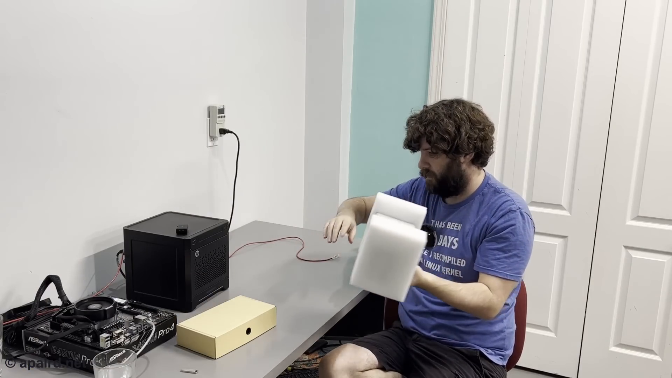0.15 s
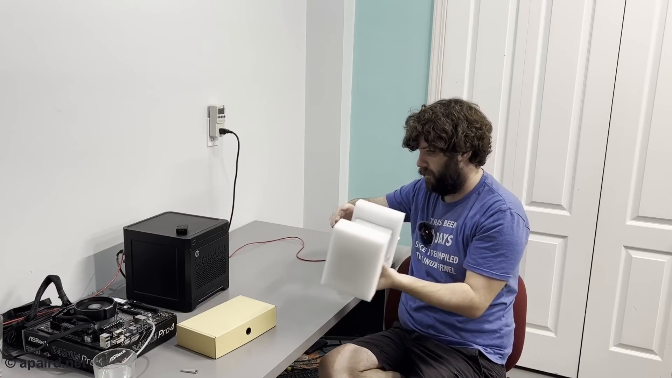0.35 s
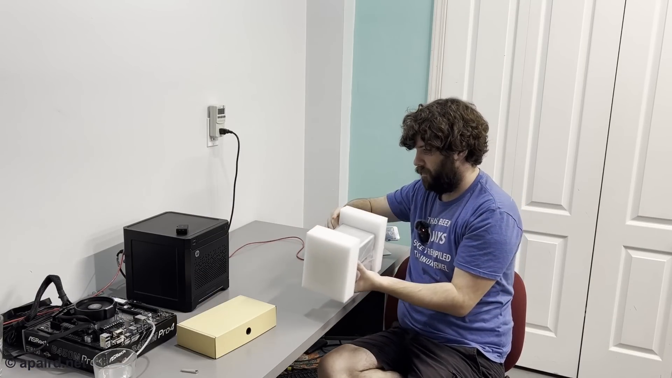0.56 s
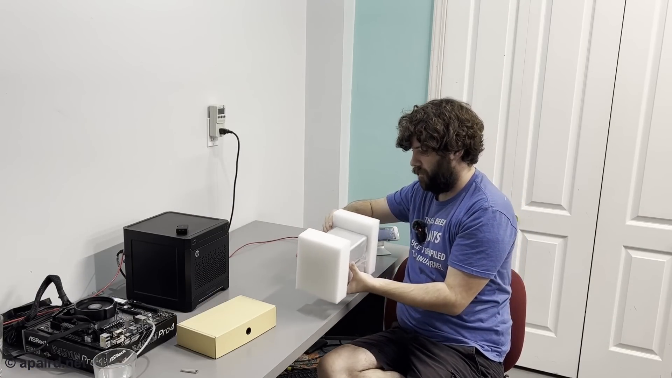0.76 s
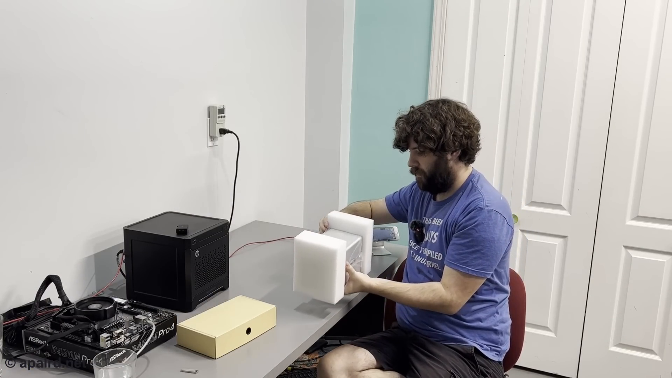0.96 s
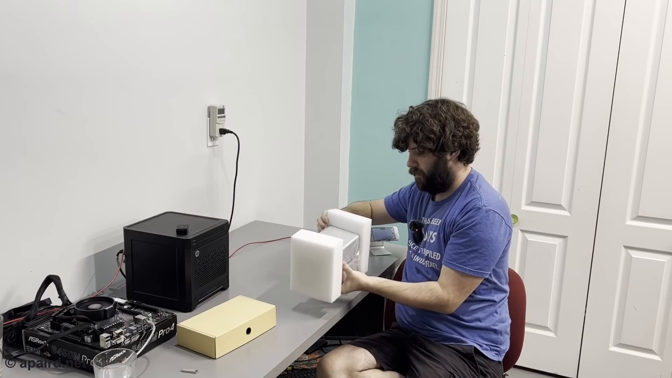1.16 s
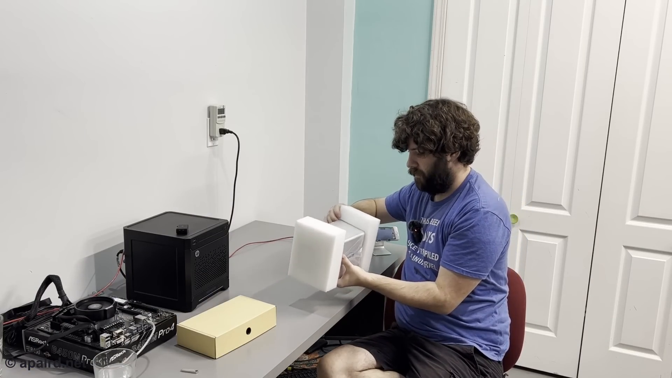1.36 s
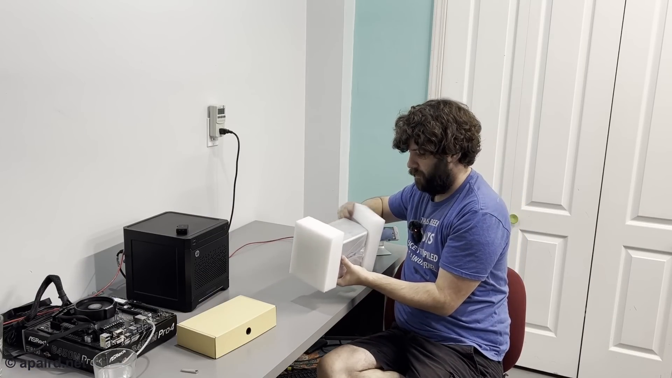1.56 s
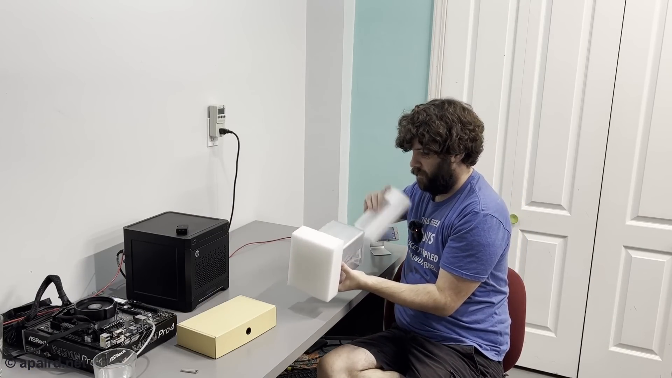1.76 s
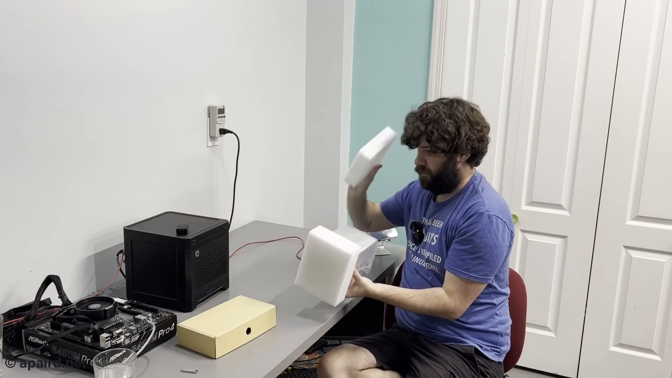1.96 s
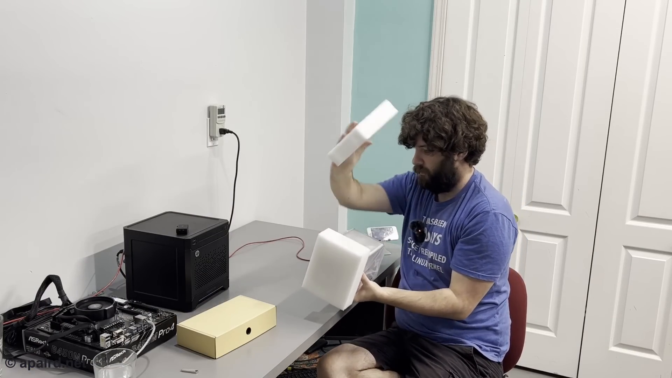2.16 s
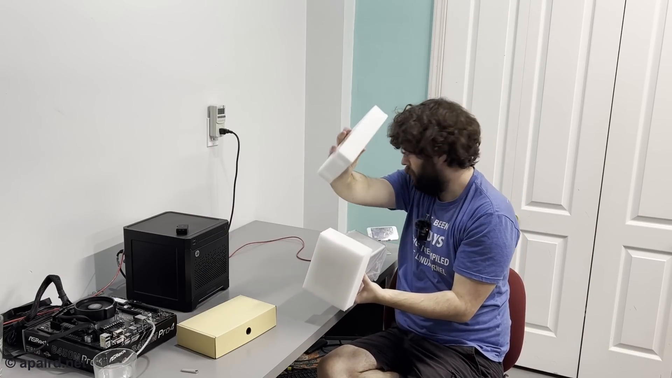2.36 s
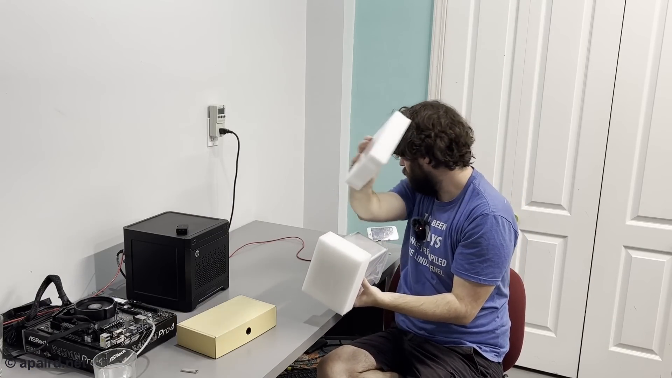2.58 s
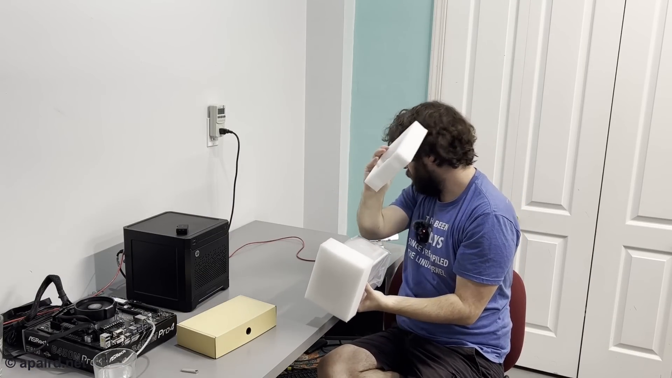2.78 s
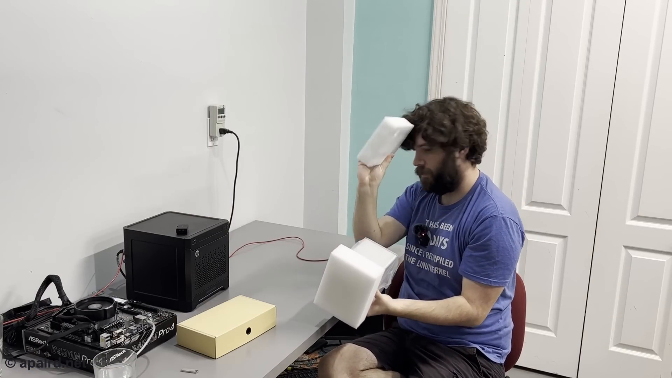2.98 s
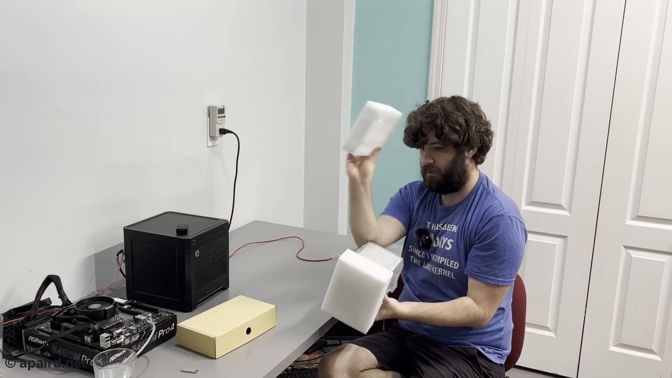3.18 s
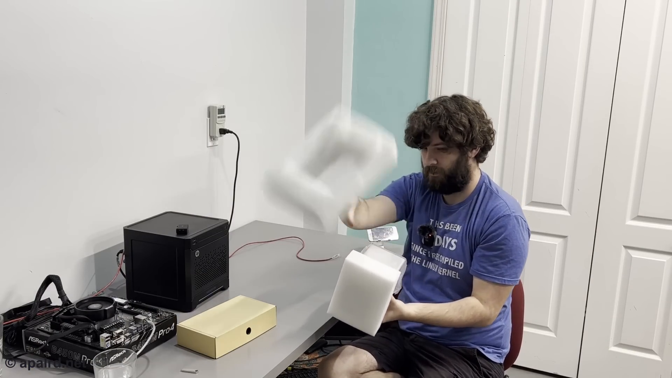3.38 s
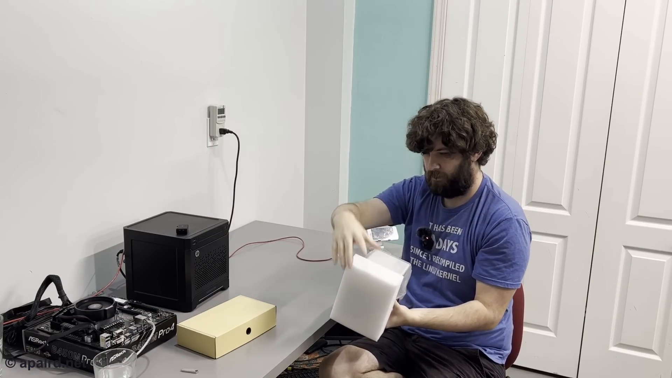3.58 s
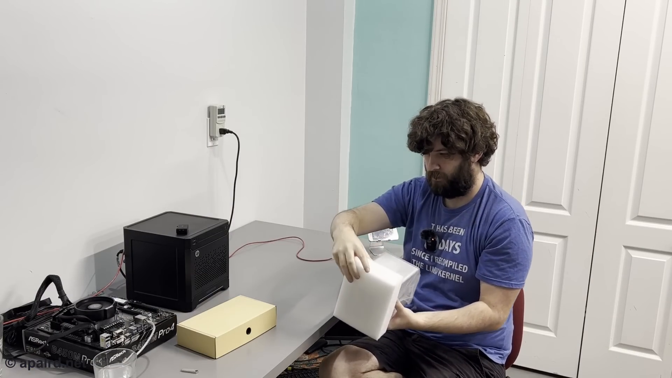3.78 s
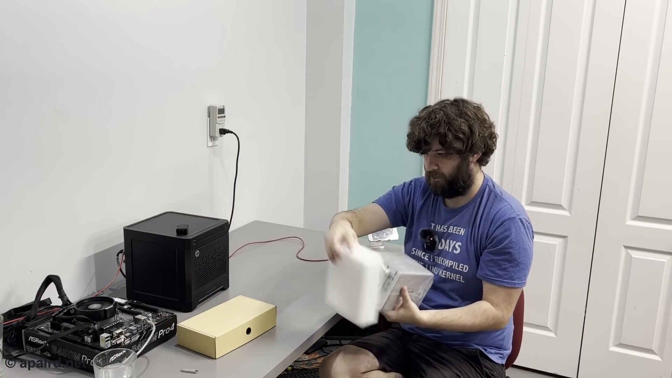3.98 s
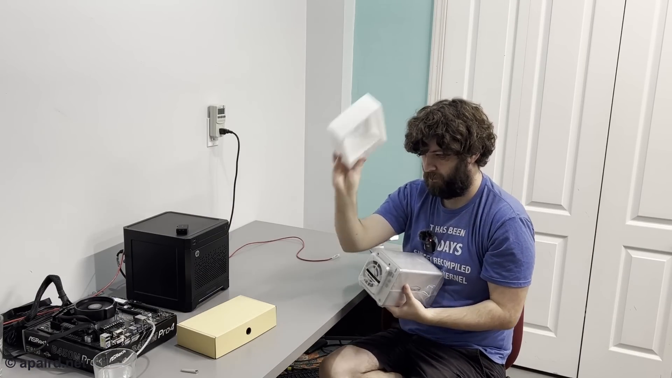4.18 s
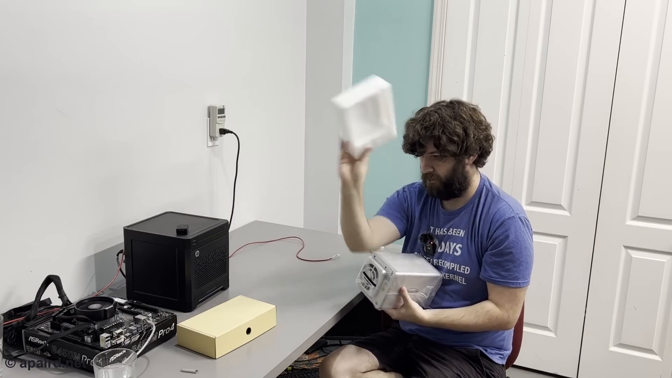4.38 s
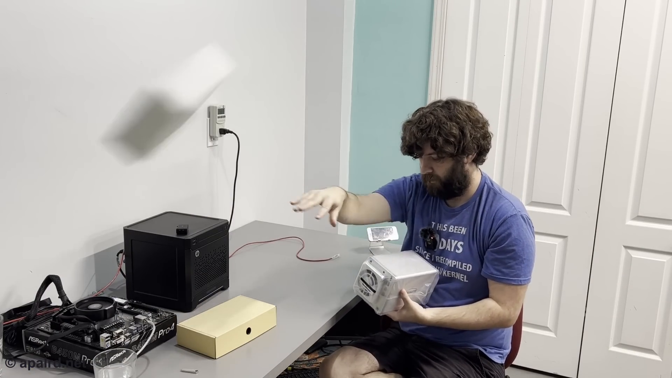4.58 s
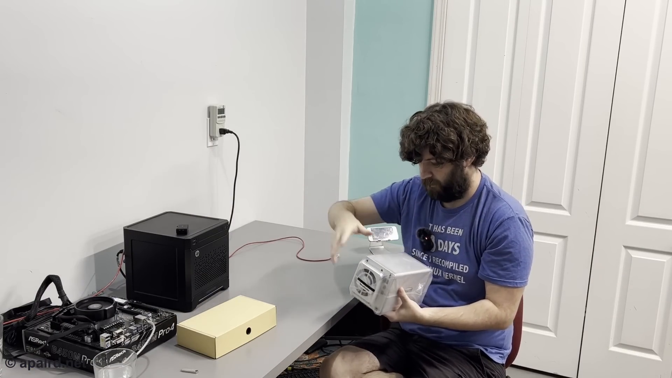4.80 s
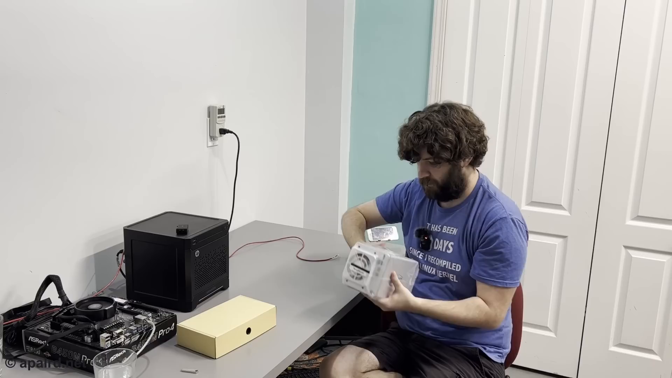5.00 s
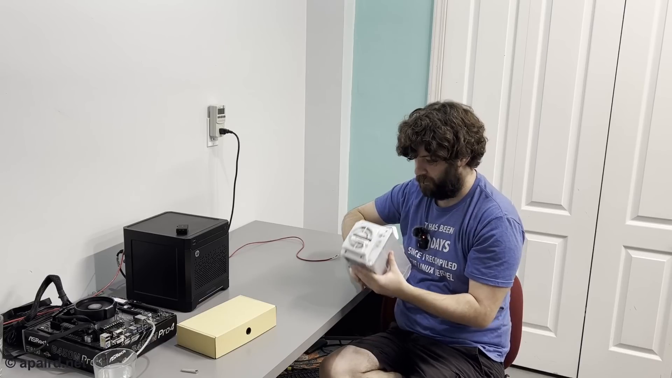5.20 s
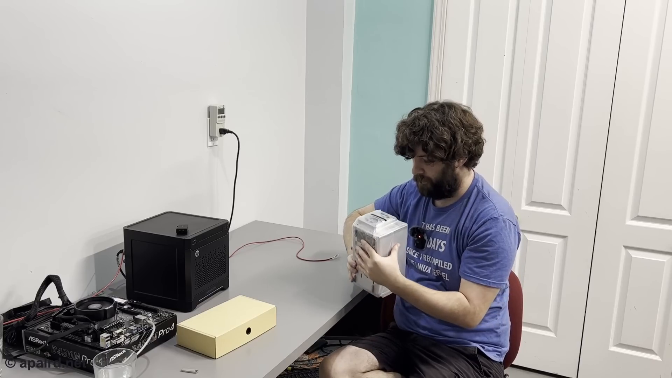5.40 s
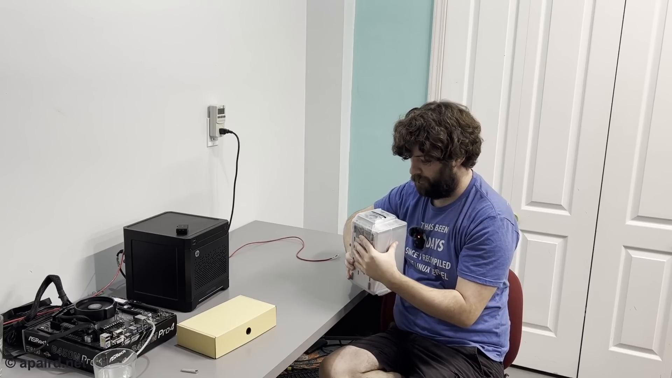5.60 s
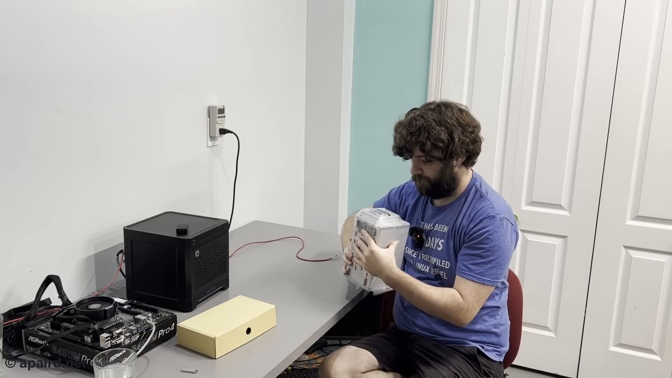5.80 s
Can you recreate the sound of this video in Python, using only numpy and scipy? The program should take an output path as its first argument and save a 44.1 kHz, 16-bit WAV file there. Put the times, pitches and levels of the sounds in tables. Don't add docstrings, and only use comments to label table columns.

```python
import sys
import numpy as np
from scipy import signal
from scipy.fft import rfft, irfft, next_fast_len
from scipy.io import wavfile
from scipy.ndimage import uniform_filter1d, map_coordinates

SR = 44100
rng = np.random.default_rng(int(sys.argv[2]) if len(sys.argv) > 2 else 0)


def wrap_up_sound(samples):
    columns = np.atleast_2d(samples).T
    tamed = np.clip(columns, -1, 1)
    steps = np.round(tamed * 32767).astype(np.int16)
    wavfile.write(sys.argv[1], SR, steps)


def nominal_scale(level):
    x = np.asarray(level, float) / 20
    return 10 ** x


N = 257896


def unit(x):
    return x / np.sqrt(np.mean(x ** 2) + 1e-20)


def along(points, hz):
    f, v = np.transpose(points)
    return np.interp(np.log(hz + 1), np.log(f + 1), v)


def filtered(x, response):
    m = next_fast_len(len(x) + 4096)
    return irfft(rfft(x, m) * response(np.fft.rfftfreq(m, 1 / SR)), m)[:len(x)]


def modes(table):
    def response(f):
        total = 0
        for k, (centre, width, db) in enumerate(table):
            damping = 1j * f * width
            total = total + (-1) ** k * nominal_scale(db) * damping / (centre * centre - f * f + damping)
        return total
    return response


def noise(spectrum, size):
    return unit(filtered(rng.standard_normal(size), lambda hz: nominal_scale(along(spectrum, hz))))


def wobble(rate):
    return map_coordinates(rng.standard_normal(int(N * rate / SR) + 4), [np.arange(N) * rate / SR])


def add(track, s, sound):
    part = track[max(round(s * SR), 0):][:len(sound)]
    part += sound[:len(part)]


def stutter(spectrum, patchy_db):
    slip_chance = 500 / SR * nominal_scale(7 * wobble(50))
    slips = (rng.random(N) < slip_chance) * nominal_scale(2.6 * rng.exponential(size=N))
    grain = 1 + 0.3 * unit(np.convolve(slips, np.exp(-np.arange(200) / 35))[:N])
    z = signal.stft(grain * rng.standard_normal(N), nperseg=256)[2]
    field = uniform_filter1d(uniform_filter1d(rng.standard_normal(z.shape), 14, 0), 3, 1)
    x = signal.istft(z * nominal_scale(patchy_db * unit(field)), nperseg=256)[1][:N]
    return unit(filtered(x, lambda hz: nominal_scale(along(spectrum, hz))))


# frequency in Hz, level in dB per Hz
HISS = [(1200, 5), (2200, -0.5), (3000, -3.5), (4500, 1), (6500, 0), (9000, -11), (16000, -46)]
SCRAPE = [(120, -16.5), (200, -2.5), (430, -8.5), (793, -9), (1080, -14.5), (1500, -12.5), (3500, -25),
          (4550, -58), (7700, -120)]
AIR = [(4000, -40.5), (7500, 2.5), (10000, 1.5), (13000, -3), (16200, -7.5)]
# loudest moment in seconds, hiss in dB, scrape over hiss in dB,
# rise and fall in seconds per 20 dB (sign ignored)
RUBS = [(.784, -54, 11.5, 0.031, 0.01), (.816, -54.5, 7.5, 0.0038, 0.06), (1.06, -58.5, 8, 0.078, 0.12),
        (1.15, -52, -6, 0.15, .09), (1.342, -53, 9, 0.013, 0.1), (1.478, -59, 7, 0.03, 0.25),
        (1.435, -55, 6, .005, .06), (1.285, -62, 10, .03, .05), (1.598, -41, 4, 0.019, 0.13),
        (1.734, -36, 1, 0.044, 0.09), (1.83, -40, 2, 0.1, 0.08), (1.916, -43.5, -20, .018, 0.12),
        (1.977, -37, 3, 0.004, 0.07), (2.04, -60, 17, .02, 0.0442), (2.097, -62, 17, .03, .03),
        (3.684, -61, 11, 0.072, 0), (1.56, -59.5, 7.5, 0.11, 0.18), (3.898, -47.5, -2.5, 0.29, 0.16),
        (3.954, -49.5, 9.5, 0.029, 0.45), (4.16, -60, 16.5, .02, 0.24), (4.275, -64, -17, .03, 0.1),
        (4.973, -54, 1, 0.023, 0.06), (5.124, -45, -8, 0.011, -0.07), (4.066, -46, -10, .012, 0.05),
        (4.962, -58, -4.5, 0.013, 0.2), (1.61, -40, 0, 0.022, -0.0139), (1.846, -40, -10, .04, 0.03),
        (1.775, -41, -2, .02, .03), (1.165, -53, 3, .01, .05), (5.208, -59.5, 14, .01, 0.12),
        (5.45, -76, 14, 0.054, .5), (5.588, -56, 10, 0.012, 0.1)]
SWISHES = [(1.119, -60, -7, .04, 0.2), (2.849, -71.5, 15, 0.062, 0.17), (3.028, -60.5, 2, 0.37, 0.24),
           (3.217, -56.5, 2, 0.066, 0.08), (3.265, -57, 0.5, 0.012, 0.05), (3.638, -54.5, -12, 0.022, .1),
           (5.412, -72, 0, .015, -0.66), (5.447, -73, 0.5, .01, .04), (4.185, -61, 0, .03, -0.32),
           (5.588, -64, 1, .01, .04), (3.017, -55.5, -10, 0.013, 0.03), (4.397, -57, 9.5, 0.0058, 0.12),
           (4.438, -59.5, 2, .07, 0.15)]


def rub():
    power, t = np.zeros((3, N)), np.arange(N) / SR
    layers = [stutter(HISS, patchy_db=3.0), stutter(SCRAPE, patchy_db=4.0), stutter(AIR, patchy_db=3.5)]
    scrape_swing, air_swing = 1, 1.63
    strokes = [(*r, -4) for r in RUBS] + [(*r, 4.5) for r in SWISHES]
    for s, db, scrape_db, rise, fall, air_db in strokes:
        span = slice(max(round((s - 5 * abs(rise)) * SR), 0), round((s + 5 * abs(fall)) * SR))
        below_db = -20 * np.maximum((s - t[span]) / abs(rise), (t[span] - s) / abs(fall))
        scrape = scrape_db + scrape_swing * below_db
        air = air_db + air_swing * below_db
        power[:, span] += nominal_scale(db + np.array([below_db, scrape, air])) ** 2
    return (np.sqrt(power) * layers).sum(axis=0)


# start in seconds, peak in dB, colour in Hz, knock in dB
BURSTS = [(0.7792, -38.5, 3780, 3), (.818, -32, 4500, -1.5), (.9502, -43.5, 3905, -14.5),
          (5.2501, -44.5, 6325, -2), (1.054, -40, 3796, -5), (1.074, -41, 3810, 2.5),
          (1.0853, -35, 3450, -2), (1.1002, -38, 3880, 2.5), (1.1209, -19.5, 5290, -7),
          (1.1545, -47.5, 4870, -0.5), (1.1697, -36.5, 5305, 3), (1.3326, -35, 6020, -4.5),
          (1.4731, -23.5, 4605, -5), (1.5383, -32.5, 4600, -4.5), (1.612, -24, 5200, 2),
          (1.6846, -31.5, 4910, -3.5), (1.7286, -27, 4183, 1.5), (1.8041, -22.5, 3690, 0),
          (1.9098, -35.5, 3640, -15), (1.9723, -34, 3265, -18), (1.9914, -30, 3476, -32),
          (3.0142, -43, 6500, -9.5), (3.2636, -40.5, 5370, -2), (3.6216, -42, 6400, -5),
          (3.719, -42.5, 5170, 2.5), (3.8858, -29, 5385, -4), (4.165, -26, 4376, 1.5),
          (4.9707, -22, 6260, -14.5), (4.9896, -31.5, 4186, -8.5), (5.2085, -33.5, 3875, -12.5)]
# start in seconds, peak in dB, knock in dB, air in dB
TICKS = [(0.3776, -54.5, 14.5, -21.5), (0.4911, -33.5, 1, -27.5), (0.6577, -55, 8, -17),
         (1.287, -48.5, 4, -14.5), (1.3403, -58, 17, -8), (1.431, -42.5, 9.5, 5.5), (1.4894, -63, 4, -16),
         (1.943, -48.5, -16, 2), (2.1156, -50, 4, -20), (2.8308, -57.5, -4.5, -11.5), (3.1802, -72, -1, 7),
         (3.2151, -54.5, 10, -10), (3.9589, -44, 3, -15.5), (3.9774, -45.5, -2, -16.5),
         (4.0327, -38, -5, -27), (4.0571, -48.5, 12.5, -16.5), (4.144, -39, -1, -3),
         (4.1567, -36, -5.5, -0.5), (4.1886, -47, 1, -15.5), (4.2138, -34.5, -35, -28),
         (4.2306, -43.5, 6, -14), (4.2541, -31, 10, -13), (4.3296, -44.5, 5, -29),
         (4.3954, -39.5, 0.5, -14), (4.4383, -47.5, -8, -1.5), (4.667, -58.5, 18.5, -15),
         (5.0193, -52, 2, -7.5), (.9936, -48, -15, 1.5), (5.6423, -55.5, 5.5, -1), (5.7988, -57.5, 8, -14)]


def snaps():
    out, t = np.zeros(N), np.arange(SR // 12) / SR
    bright = [(s, db, hz, knock_db, -12.5 - 0.55 * (db + 35.5)) for s, db, hz, knock_db in BURSTS]
    dull = [(s, db, 2622, knock_db, air_db) for s, db, knock_db, air_db in TICKS]
    for s, db, hz, knock_db, air_db in bright + dull:
        burst = nominal_scale(-60 * t / 0.0084) * rng.standard_normal(len(t))
        burst[0] += 4
        parts = [(0, hz, 0.75 * hz), (knock_db, 1300, 1900), (air_db, 9500, 8000)]
        for part_db, centre_hz, width_hz in parts:
            part = filtered(burst, lambda f: modes([(centre_hz, width_hz, 0)])(f) ** 2)
            add(out, s, nominal_scale(db + part_db + 3.5) * part / np.abs(part).max())
    return out


# frequency in Hz, width in Hz, level in dB
HOLLOW = [(175, 33, 5.5), (302, 75, 0.5), (390, 110, -1), (567, 120, -1), (658, 28, -0.5)]
# frequency in Hz, level in dB per Hz
EDGE = [(500, -24.5), (840, 3), (1100, -3.5), (1600, -4.5), (2300, -11.5), (3200, -17.5), (6000, -25.5),
        (16000, -46)]
# start in seconds, peak in dB, ring in Hz, edge in dB, t60 in seconds
DROPS = [(.084, -7.5, 506, -1.5, 0.46), (.087, -9, 450, -10.5, .06), (.148, -13, 530, -11, .42),
         (.494, -17.5, 388, -8.5, .34), (.527, -21, 410, -10.5, .26), (1.994, -23, 420, -24, 0.35),
         (5.113, -19.5, 169, -17, 0.184), (5.136, -19.5, 175, -10.5, 0.34), (5.197, -30.5, 242, -4.5, 0.2),
         (5.439, -41.5, 189, -15, 0.27), (5.573, -19, 219, -16, 0.31)]
TUMBLES = [(0.0, -7, 420, -10.5, 0.29), (2.131, -28, 184, -14.5, 0.4), (3.634, -34, 784, -3, 0.15),
           (3.957, -26, 597, -6, 0.095), (3.972, -20, 835, -10, 0.047), (4.015, -24, 427, -20, 0.31),
           (4.057, -17, 432, -14.5, 0.28), (4.082, -15, 533, -34, 0.11), (4.128, -25.5, 183, -22, 0.34),
           (4.414, -29.5, 457, -9.5, 0.53), (4.442, -28.5, 326, -17, 0.44), (5.322, -41, 422, -6, 0.37)]


def thuds():
    out, t = np.zeros(N), np.arange(SR // 2) / SR
    blows = [(*r, 2.5) for r in DROPS] + [(*r, -2) for r in TUMBLES]
    for s, db, ring_hz, edge_db, t60, ring_db in blows:
        after = np.clip(t - .006, 0, None) / t60
        body = unit(filtered(rng.standard_normal(len(t)), modes(HOLLOW)))
        blur = unit(filtered(rng.standard_normal(len(t)), modes([(ring_hz, 0.13 * ring_hz, 0)])))
        clean = nominal_scale(-60 * t / .12) * np.sin(2 * np.pi * ring_hz * t)
        ring = 0.54 * blur + 0.7 * clean
        wood = filtered(0.51 * body + nominal_scale(ring_db) * ring, lambda hz: 1 / (1 + (hz / 1500) ** 4))
        edge = noise(EDGE, len(t))
        dull = filtered(edge, lambda hz: 1 / (1 + (hz / 3000) ** 4))
        edge = nominal_scale(-70 * after) * dull + nominal_scale(-125 * after) * (edge - dull)
        edge = edge * (1 + 0.44 * nominal_scale(-60 * t / 0.017))
        rise = 1 - np.exp(-t / 0.001)
        add(out, s, nominal_scale(db - 8.0) * rise * (nominal_scale(-60 * after) * wood + nominal_scale(edge_db) * edge))
    return out


# frequency in Hz, level in dB, t60 in seconds
TABLE_TOP = [(295, -4.5, 0.33), (335.7, -12, 0.85), (431.4, 0, 0.27), (494.5, -2.5, 0.5),
             (701, -17.5, 0.88), (823, -3, 0.33), (1061, -5.5, 0.36), (1153, -7, 0.27), (1306, -6.5, 0.29),
             (1492, -12.5, 0.46), (1760, -15.5, 0.36), (2293, -23, 0.31)]
# start in seconds, peak in dB
SLAMS = [
    (0.0, -30),
    (.085, -23),
    (.15, -29),
]


def slams():
    out, t = np.zeros(N), np.arange(SR // 2) / SR
    for s, db in SLAMS:
        ring = np.zeros(len(t))
        for hz, level, t60 in TABLE_TOP:
            t60 = min(t60, 0.38)
            decay = nominal_scale(level + 1.8 * rng.standard_normal() - 60 * t / t60)
            phase = 2 * np.pi * (hz * t + rng.random()) + 0.8 * wobble(30)[:len(t)]
            ring += decay * np.sin(phase)
        add(out, s, nominal_scale(db) * (1 - np.exp(-t / 0.002)) * ring)
    return out


# start in seconds, peak in dB, frequency in
# Hz, t60 in seconds
SHOVES = [(0.498, -19.5, 402, 0.17), (0.821, -21, 367, 0.015), (1.073, -39, 138, 0.053),
          (1.611, -9, 162, 0.026), (1.684, -13.5, 340, 0.022), (1.723, -20.5, 83.4, 0.06),
          (1.751, -19, 88, 0.04), (1.788, -18.5, 185.5, 0.084), (1.8, -17.5, 92.5, 0.08),
          (1.926, -33.5, 113, 0.27), (2.1, -29.5, 122, 0.062), (2.18, -43.5, 114, 0.18),
          (3.16, -50.5, 88.5, 0.098), (3.23, -44, 117, 0.036), (3.722, -36, 150, 0.065),
          (3.812, -22.5, 218, 0.025), (4.209, -30, 243, 0.03), (.5, -38, 120, .25), (.245, -30, 520, .25),
          (5.846, -36, 150, .05), (5.011, -35, 380, 0.027), (5.78, -29, 387, 0.023),
          (5.835, -30, 412, 0.037),
          (0.384, -48.5, 111, 0.24),
    (1.981, -33, 120, 0.17),
    (2.005, -39, 118.8, 0.082),
    (3.876, -53, 109, 0.12),
    (3.956, -35, 146, 0.054),
    (4.016, -36.5, 125, 0.16),
    (4.121, -38, 149, 0.077),
    (5.111, -32.5, 145.4, 0.09),
]


def shoves():
    out, t = np.zeros(N), np.arange(SR // 4) / SR
    for s, db, hz, t60 in SHOVES:
        push = nominal_scale(db + 2.5 - 60 * t / t60) * (1 - np.exp(-t / 0.0039))
        add(out, s, push * np.sin(2 * np.pi * hz * t))
    return out


# frequency in Hz, level in dB, t60 in seconds
CAP = [(420, -3, 0.09), (608.5, 0, 0.085), (744, -3, 0.07), (1084, 4.5, 0.038), (1240, -10, 0.058),
       (1457, 4, 0.0194)]
# start in seconds, peak in dB
TAPS = [
    (1.9745, -13.5),
    (1.991, -18),
    (2.0, -22.5),
    (2.007, -25),
    (2.115, -24.5),
    (2.121, -25),
]


def taps():
    out, t = np.zeros(N), np.arange(SR // 5) / SR
    for s, db in TAPS:
        ring = np.zeros(len(t))
        for hz, level, t60 in CAP:
            ring += nominal_scale(level + 2 * rng.standard_normal() - 60 * t / t60) * np.sin(2 * np.pi * hz * t)
        add(out, s, nominal_scale(db + 7) * (1 - np.exp(-t / 0.00068)) * ring / np.abs(ring).max())
    return out


# start in seconds, peak in dB, frequency in Hz, t60 in seconds
PINGS = [(.0838, -9.5, 1630, 0.01), (.0912, -1, 600, .012), (.097, -9, 560, .015), (.16, -24, 2050, .03),
         (1.975, -22, 1500, .025), (1.98, -33, 3300, .02), (5.574, -30, 700, .02), (1.431, -36, 1200, .012),
         (2.0, -58, 12500, .05), (.0912, -17.5, 3170, .01), (1.156, -31, 1790, 0.011),
         (1.161, -40.5, 1510, .01), (1.181, -40.5, 2500, .006), (1.28, -43, 900, .012),
         (1.3355, -41.5, 5500, .004), (1.3403, -36, 1200, 0.013), (1.491, -32, 790, .025),
         (1.5673, -43, 2890, .006), (1.5932, -30, 1490, 0.011), (1.608, -28, 1270, .015),
         (1.663, -38, 5500, .005), (1.686, -34, 1840, .012), (1.7284, -21, 1860, 0.034),
         (1.755, -28, 4500, 0.013), (1.913, -33, 2250, .008), (3.636, -36, 1400, .015),
         (3.73, -44, 5500, .005), (3.925, -32.5, 420, 0.021), (3.9715, -23.5, 800, .025),
         (3.977, -21.5, 990, .015), (3.996, -34.5, 2130, .008), (4.033, -34.5, 6400, .004),
         (4.049, -39.5, 5000, .005), (4.1255, -41.5, 5000, .005), (4.166, -28, 1160, 0.022),
         (4.171, -33, 4500, .005), (4.184, -42, 2500, .006), (4.189, -42, 8300, .005),
         (4.259, -32.5, 2380, .007), (4.418, -34.5, 500, .02), (4.448, -32, 380, .03),
         (4.479, -42, 1647, .008), (5.006, -43, 1700, 0.013), (5.2605, -44, 6060, .004),
         (5.6423, -43.5, 4300, .008), (5.7988, -50, 4130, .008), (5.823, -60, 14300, .006),
         (5.8445, -49, 4200, .008)]


def pings():
    out, t = np.zeros(N), np.arange(SR // 20) / SR
    for s, db, hz, t60 in PINGS:
        rough = unit(filtered(rng.standard_normal(len(t)), lambda f: modes([(hz, 0.6 * hz, 0)])(f) ** 2))
        level = nominal_scale(db + 1 - 60 * t / t60) * (1 - np.exp(-t / 0.00026))
        add(out, s, level * (np.sin(2 * np.pi * hz * t) + 0.25 * rough))
    return out


# frequency in Hz, width in Hz, level in dB
RASP = [(1930, 150, 0), (4500, 800, -3), (6400, 370, -3.5)]
CHIRR = [(2700, 900, 0), (4000, 900, -2), (5500, 700, -2)]


def rasp():
    out, t = np.zeros(N), np.arange(SR // 5) / SR
    slips = [(1.726, -29, 0.15, RASP, .0023),
             (4.262, -46, 0.14, CHIRR, .015)]
    for s, db, t60, table, rise in slips:
        grit = unit(filtered(rng.standard_normal(len(t)), lambda f: modes(table)(f) ** 2))
        add(out, s, nominal_scale(db - 60 * t / t60) * (1 - np.exp(-t / rise)) * grit)
    return out


# time in seconds, frequency in Hz, level in dB
SQUEAK = [
    (5.6, 10600, -84),
    (5.621, 11260, -76),
    (5.655, 12420, -70),
    (5.675, 13050, -70),
    (5.695, 13520, -70),
    (5.73, 13670, -70),
    (5.773, 13350, -71),
    (5.805, 12740, -72),
    (5.845, 12780, -70),
]


def squeak():
    s, hz, db = np.transpose(SQUEAK)
    t = np.arange(N) / SR
    level = nominal_scale(np.interp(t, s, db, left=-120) + 2 + 1.5 * wobble(60))
    return level * np.sin(2 * np.pi * np.cumsum(np.interp(t, s, hz) + 25 * wobble(140)) / SR)


# start in seconds, length in
# seconds, frequency in Hz, level in dB
WHISPER = (5.675, -0.2, 9920, -74)


def whisper():
    out, (s, length, hz, db) = np.zeros(N), WHISPER
    t = np.arange(round(length * SR)) / SR
    add(out, s, nominal_scale(db) * np.sqrt(np.hanning(len(t))) * np.sin(2 * np.pi * hz * t))
    return out


# frequency in Hz, t60 in seconds
WALLS = [(200, 0.14), (1000, 0.18), (5000, 0.21), (14000, 0.33)]


def room(x):
    out, step = np.zeros(N), SR // 4
    for start in range(0, N, step):
        hz, t, z = signal.stft(rng.standard_normal(SR // 2), SR, nperseg=256)
        tail = signal.istft(z * nominal_scale(-60 * t / along(WALLS, hz)[:, None]), SR, nperseg=256)[1]
        echo = signal.fftconvolve(x[start:start + step], tail / np.linalg.norm(tail))
        add(out, start / SR + 0.0029, echo)
    return out


# frequency in Hz, level in dB per Hz
HUM = [(12, -46), (20, -19), (102, -6), (199, -12), (229, -3), (294, -18), (339, -11.5), (1160, -21.5),
       (1260, -24), (1870, -24), (2770, -29), (3010, -30.5), (7380, -30.5), (16200, -40.5)]
# time in seconds, level in dB
GAIN = [
    (0, 7.5),
    (.7, 3),
    (2.2, 3.5),
    (3.3, 2.5),
    (3.6, 0),
    (4.6, 3),
    (5.4, 1),
    (5.85, 1.5),
]


def hum():
    s, db = np.transpose(GAIN)
    level_db = -63 + np.interp(np.arange(N) / SR, s, db) + 0.44 * wobble(4.9)
    return nominal_scale(level_db) * noise(HUM, N)


def scene():
    near = snaps() + rub() + taps()
    heard = thuds() + near + shoves() + nominal_scale(-10.5) * room(near) + squeak() + hum() + rasp()
    small = pings()
    return (heard + slams() + whisper() + small + nominal_scale(-11) * room(small))[None]


# centre in seconds, length in seconds, lowest Hz, share of lines kept
STARVED = [(.52, .03, 4000, .02), (.59, .03, 4000, .02), (.757, .035, 2500, .06), (1.015, .03, 3000, .06),
           (1.138, .03, 2200, .07), (1.736, .022, 6900, 0), (2.42, .03, 2500, .12), (2.465, .03, 2500, .08),
           (2.57, .03, 2500, .1), (2.7, .03, 2000, .08), (2.85, .03, 2500, .08), (3.0, .03, 2000, .12),
           (3.105, .03, 2000, .08), (3.382, .075, 1500, .07), (3.765, .035, 2200, .08),
           (4.0, .03, 3500, .08), (4.275, .03, 6000, 0), (4.725, .03, 2000, .08), (4.92, .03, 3000, .06),
           (5.345, .026, 3000, .04), (5.535, .026, 3000, .04)]


def starved(x):
    out = x.copy()
    for s, length, from_hz, share in STARVED:
        fade = np.minimum(1.4 * np.hanning(round(length * SR)), 1 - 1.5 * share)
        start = round(s * SR) - len(fade) // 2
        kept = rng.random(600) < 4 * share * np.exp(-(np.arange(600) / 170) ** 2)
        lost = lambda hz: (hz > from_hz) * (1 - 2.6 * kept[(hz // 43).astype(int)])
        around = x[start - 2048:start + len(fade) + 2048]
        add(out, start / SR, -fade * filtered(around, lost)[2048:-2048])
    return out


def top_cut(x):
    return signal.sosfilt(signal.butter(12, 16320, fs=SR, output="sos"), x)


def record(dry):
    limited = filtered(dry[0], lambda hz: hz < 15900)
    return top_cut(starved(limited)[None])


dry = scene()
out = record(dry)
wrap_up_sound(out)
```